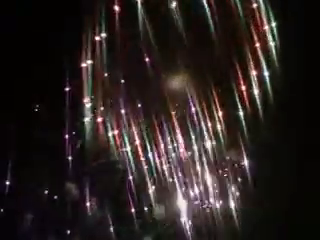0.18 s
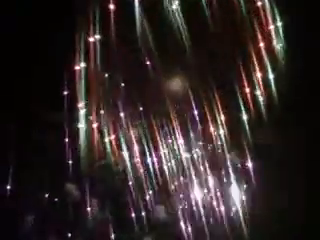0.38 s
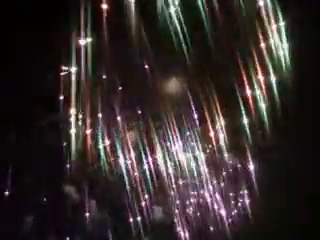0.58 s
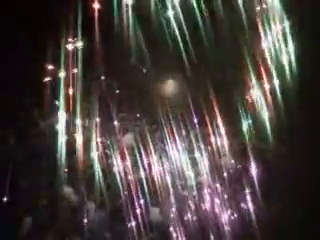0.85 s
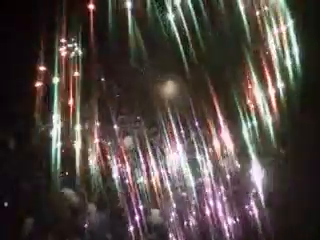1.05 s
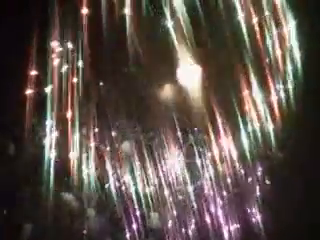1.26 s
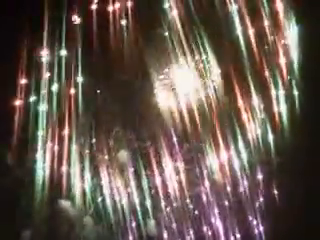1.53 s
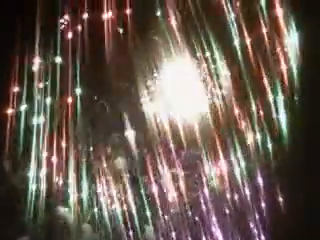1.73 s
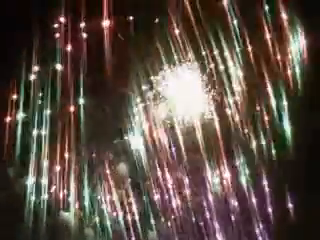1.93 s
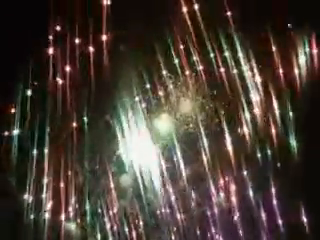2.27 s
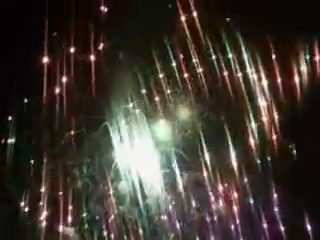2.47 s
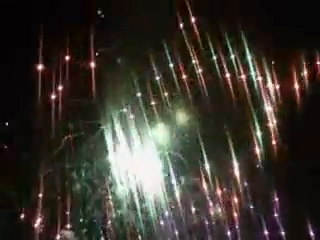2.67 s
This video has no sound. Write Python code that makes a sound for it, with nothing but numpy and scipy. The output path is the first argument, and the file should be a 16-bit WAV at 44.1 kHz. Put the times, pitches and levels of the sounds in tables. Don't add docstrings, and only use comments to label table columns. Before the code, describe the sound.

Fireworks crack and bang in rapid irregular clusters overhead, with two big booms and constant distant crackle.

```python
import sys
import numpy as np
from scipy import signal
from scipy.fft import rfft, irfft, next_fast_len
from scipy.io import wavfile
from scipy.ndimage import uniform_filter1d, map_coordinates

SR = 44100
rng = np.random.default_rng(int(sys.argv[2]) if len(sys.argv) > 2 else 0)


def volts_from_decibels(level):
    exponent = np.asarray(level, float) / 20
    return 10 ** exponent


def generate_wav(signal):
    frames = np.transpose(np.atleast_2d(signal))
    scaled = np.clip(frames, -1, 1) * 32767
    pcm = np.round(scaled).astype(np.int16)
    wavfile.write(sys.argv[1], SR, pcm)


N = 123479
LEAD = 1024


def unit(x):
    return x / np.sqrt(np.mean(x ** 2) + 1e-20)


def colour(x, points):
    m = next_fast_len(len(x) + 4096)
    hz, db = np.transpose(points)
    log_hz = np.log(np.fft.rfftfreq(m, 1 / SR) + 1)
    gain = volts_from_decibels(np.interp(log_hz, np.log(hz + 1), db, right=-120))
    return irfft(rfft(x, m) * gain, m)[:len(x)]


def wobble(rate):
    knots = rng.standard_normal(int(N * rate / SR) + 4)
    return map_coordinates(knots, [np.arange(N) * rate / SR])


def add(track, s, sound):
    part = track[round(s * SR):][:len(sound)]
    part += sound[:len(part)]


def blast(ms, air):
    thin_hz, thin_db = 280 / ms, -9.5
    soft_db = -8
    rebound, rebound_lengths = .5, 2.1
    phase_lag = 1.15

    u = np.arange(-LEAD, 2 * LEAD) / SR / (ms / 1000)
    push_suction = np.where(u >= 0, (1 - u) * np.exp(-np.abs(u)), 0)
    wave = colour(push_suction, air)
    wave = colour(wave, [(20, thin_db), (thin_hz, 0), (2 * thin_hz, 0), (10 * thin_hz, soft_db), (SR, soft_db)])
    wave = wave - rebound * np.roll(wave, round(rebound_lengths * ms * SR / 1000))
    wave = np.real(signal.hilbert(wave) * np.exp(-1j * phase_lag))
    return np.roll(wave, LEAD - np.argmax(wave)) / wave.max()


# frequency in Hz, level in dB.
AIR = [(25, -42.5), (100, 6.5), (400, 4), (1500, 3), (2300, -1), (3500, -13), (4400, -23)]


def bursts(table, echo_ms, spread_ms, tail_db, t60):
    bright_db, second_echo_db = -1, -2.5
    out, t = np.zeros(N), np.arange(SR // 5) / SR
    for s, db, ms, echo_db in table:
        direct = blast(ms, AIR)
        paths = rng.standard_normal(len(t)) * rng.random(len(t)) ** 6
        scatter = np.convolve(paths, direct, "same")
        scatter = unit(colour(scatter, [(800, 0), (3000, bright_db), (SR, bright_db)]))
        scatter *= volts_from_decibels(tail_db - 60 * t / t60) * (1 - np.exp(-t / .002))
        add(out, s + 0.000992, volts_from_decibels(db) * scatter)

        start, echo_s = s - LEAD / SR, echo_ms / 1000
        add(out, start, volts_from_decibels(db) * direct)
        add(out, start + echo_s, volts_from_decibels(db + echo_db) * blast(.85 * ms, AIR))
        second = -volts_from_decibels(db + echo_db + second_echo_db) * blast(1.2 * ms, AIR)
        add(out, start + echo_s + spread_ms / 1000, second)
    return out


SALUTE_ECHO_MS = 7.7

# time of the peak in seconds, peak in dB, blast length in ms, ground echo in
# dB.
SALUTES = [(.2087, -2.2, .5, -5), (.2957, -2.1, .45, -4), (.4427, -5.5, .4, .5), (.4549, -5.5, .4, -12),
           (.4732, -.3, .4, -6), (.4981, -3.3, .55, -3), (.5137, -2.6, .4, -8), (.5227, -2.2, .3, -8),
           (.5728, -4.8, .3, 1), (.6803, -1, .45, -3), (.7036, -7, .35, -8), (.9149, -4.2, .45, -3),
           (.9321, -5.5, .4, -6), (.9604, -1.8, .4, -8), (.9727, -4.5, .4, -8), (.9864, -2.5, .45, -4),
           (.9966, -4.5, .4, -6), (1.0888, -2.5, .42, -4), (1.2673, -2.4, .35, -5), (1.303, -3.1, .45, -4),
           (1.4099, -4.3, .35, -7), (1.8177, -2, .5, -2), (1.8678, -3.8, .35, -7), (1.8713, -5.5, .3, -8)]


def salutes():
    return bursts(SALUTES, SALUTE_ECHO_MS, spread_ms=1.8, tail_db=-15.5, t60=0.15)


# frequency in Hz, level in dB.
SPIT = [(2200, -31.5), (2900, -5.5), (3400, -1), (4000, -18.5), (4600, -31.5)]


def spits():
    spit_db, lead_s, t60, rise_s = -25.5, 0.00205, 0.052, 0.00017
    out, t = np.zeros(N), np.arange(SR // 10) / SR
    for s, db, ms, echo_db in SALUTES:
        for late, more_db in ((0, 0), (SALUTE_ECHO_MS / 1000, echo_db)):
            hiss = unit(colour(rng.standard_normal(len(t)), [(20, -120)] + SPIT))
            decay = volts_from_decibels(db + more_db + spit_db - 60 * t / t60)
            add(out, s + late - lead_s, decay * hiss * (1 - np.exp(-t / rise_s)))
    return out


# time of the peak in seconds, peak in dB, blast length in ms, ground echo in
# dB.
CRACKERS = [(.054, -15, .2, -8), (.6526, -4.5, .22, -10), (.8758, -5.7, .18, -8), (.955, -6, .2, -9),
            (1.0145, -2.3, .22, -10), (1.0513, -2.3, .24, -8), (1.1463, -2.4, .18, -12),
            (1.1637, -6, .2, -4), (1.2086, -6, .18, -9), (1.2252, -2, .2, -7), (1.2306, -2.3, .22, -12),
            (1.2424, -2.5, .2, -3), (1.2704, -2.8, .24, -4), (1.3568, -2.3, .2, -3),
            (1.3841, -1.5, .18, -10), (1.4062, -7, .2, -8), (1.414, -5.5, .2, -10), (1.4849, -7, .2, -10),
            (1.5175, -5.5, .2, -8), (1.5748, -2, .18, -5), (1.628, -14, .2, -8), (1.6794, -1.8, .2, -12),
            (1.6932, -6, .2, -8), (1.7285, -3.6, .18, -12), (1.9486, 0, .2, -8), (1.9689, -5, .22, -6),
            (2.0368, -7.5, .22, -8), (2.2592, -7, .18, -8), (2.5281, -10, .2, -8), (2.3205, -9, .18, -10)]


def crackers():
    return bursts(CRACKERS, echo_ms=10.4, spread_ms=.5, tail_db=-17.5, t60=0.077)


# time of the peak in seconds, peak in dB, blast length in ms.
FRONTS = [(1.7412, -3, 1.1), (1.7482, -1, 1.2), (1.7512, -2, 1.1), (1.757, 1, 1.7), (1.7644, -2, 1.3),
          (1.7738, -6, 1.2), (1.7796, -10, .8), (1.7843, -6, 1.2), (1.7916, -10, 1), (1.7963, -1.5, 1.4),
          (1.802, -9, 1), (1.8058, -9, 1.1), (1.8137, -9, 1.6), (2.3251, -1, 1.1), (2.3288, -4, 1.2),
          (2.3338, -2, .4), (2.3388, -4, 1.3), (2.554, -15, .9)]
# frequency in Hz, level in dB.
BOOM = [(25, -63), (60, -20.5), (110, -6), (200, -2.5), (500, -3), (1500, -4.5), (4400, -34)]
# start in seconds, roll in dB, crash in dB,
# roll decay by 60 dB in seconds, rise in ms.
SHELLS = [
    (1.7402, -15, -7.5, 0.86, 3.4),
    (1.885, -15, -29, 0.62, 12),
    (2.3232, -16, -5, 0.62, 1.9),
]
# frequency in Hz, density in dB per Hz.
ROLL = [(18, -77), (30, -24), (108, 6), (360, -3), (420, -22), (854, -31.5), (1200, -28.5), (1560, -66),
        (2640, -120)]


def shells():
    lumps_db, crash_t60 = 2.5, 0.16
    out, t = np.zeros(N), np.arange(N) / SR
    for s, db, ms in FRONTS:
        add(out, s - LEAD / SR, volts_from_decibels(db) * blast(ms, BOOM))
    for s, roll_db, crash_db, roll_t60, rise_ms in SHELLS:
        roll = unit(colour(rng.standard_normal(N), ROLL)) * volts_from_decibels(lumps_db * wobble(24.83))
        roll *= volts_from_decibels(roll_db - 60 * t / roll_t60)
        crash = unit(colour(rng.standard_normal(N) * rng.random(N) ** 2, AIR))
        crash *= volts_from_decibels(crash_db - 60 * t / crash_t60)
        add(out, s, (roll + crash) * (1 - np.exp(-1000 * t / rise_ms)))
    return out


# time in seconds, level in dB.
FIZZ = [(0.0, -29.5), (0.55, -28.5), (0.72, -28.5), (0.95, -29), (1.09, -29), (1.17, -27), (1.54, -31.5),
        (1.81, -25), (2.15, -24), (2.37, -21.5), (2.54, -25), (2.8, -27)]
# frequency in Hz, density in dB per Hz.
STARS = [(25, -39), (90, -11.5), (400, -11.5), (1000, -12), (1600, -8.5), (2400, -21.5), (3400, -24),
         (4600, -54)]


def stars():
    pops_per_s, scatter_db, pops_db = 600, 2.5, -4
    hiss_db, patchy_db = -4, 3

    sign_draw, size_draw = rng.random((2, N))
    chance = pops_per_s / SR / 2
    pops = (sign_draw < chance) * 1. - (1 - sign_draw < chance)
    pops *= volts_from_decibels(-scatter_db * np.log(size_draw + .03) + 2 * wobble(12))

    z = signal.stft(rng.standard_normal(N), nperseg=512)[2]
    patches = uniform_filter1d(rng.standard_normal(z.shape), size=5, axis=0)
    patches = uniform_filter1d(patches, size=8, axis=1)
    hiss = signal.istft(z * volts_from_decibels(patchy_db * unit(patches)), nperseg=512)[1][:N]

    mix = volts_from_decibels(pops_db) * unit(colour(pops, STARS)) + volts_from_decibels(hiss_db) * unit(colour(hiss, STARS))
    s, db = np.transpose(FIZZ)
    return volts_from_decibels(np.interp(np.arange(N) / SR, s, db)) * mix


def scene():
    return (salutes() + spits() + crackers() + shells() + stars())[None]


def top_cut(x):
    return signal.sosfilt(signal.butter(12, 16800, fs=SR, output="sos"), x)


def record(dry):
    band_hz, edge_hz = 4300, 480
    top = .712
    m = next_fast_len(N + 4096)
    edge = np.clip((band_hz + edge_hz - np.fft.rfftfreq(m, 1 / SR)) / (2 * edge_hz), 0, 1)
    band = irfft(rfft(dry, m) * np.sin(edge * np.pi / 2) ** 2, m)[:, :N]
    mix = np.clip(band, -top, top)
    return top_cut(mix)


dry = scene()
out = record(dry)
generate_wav(out)
```